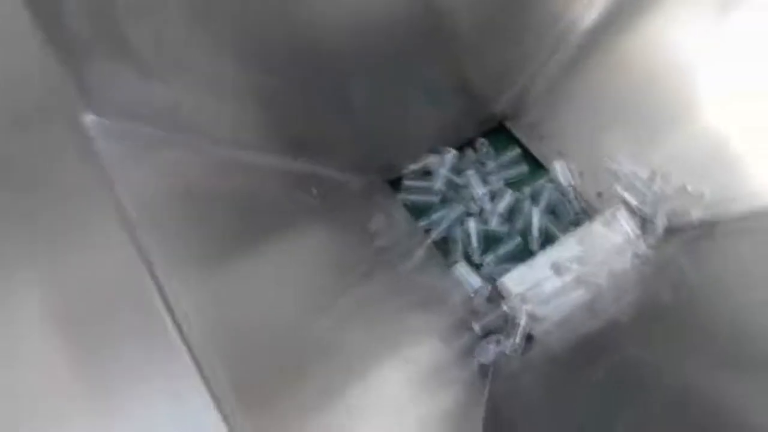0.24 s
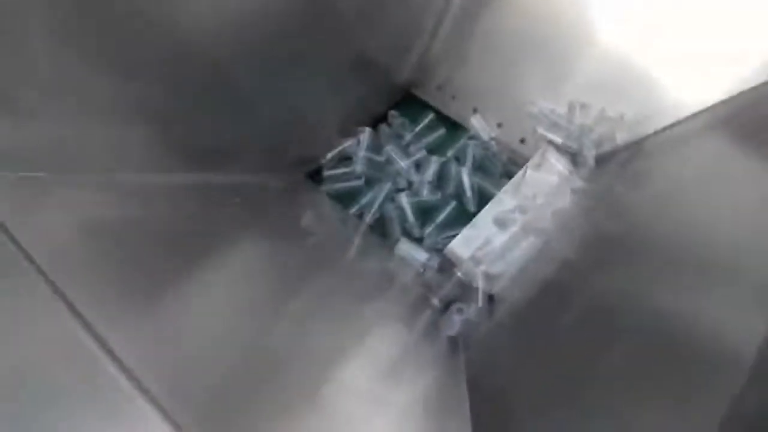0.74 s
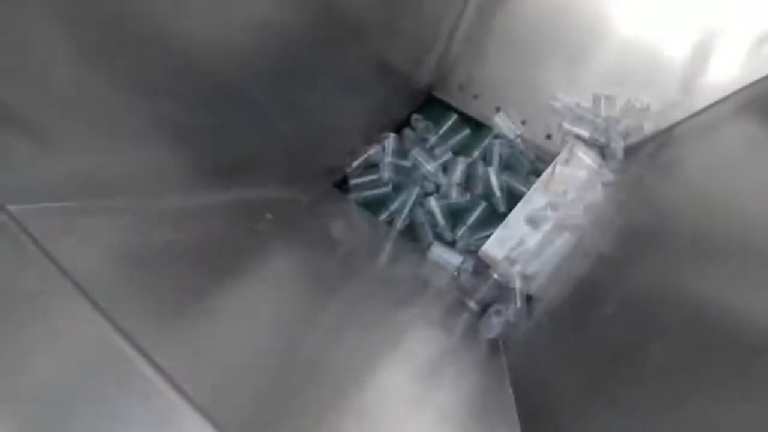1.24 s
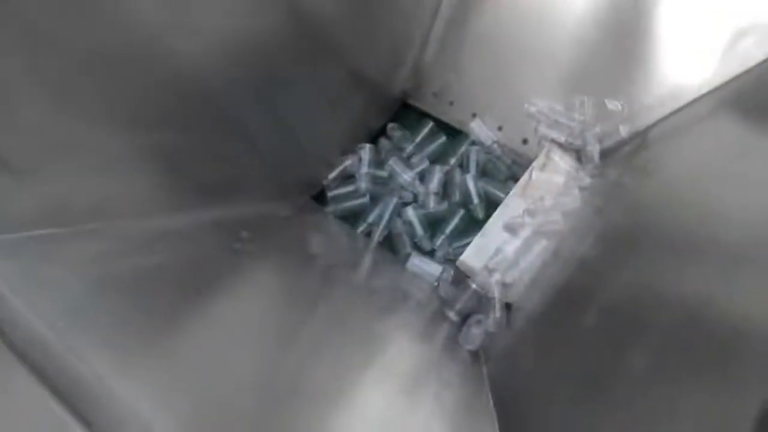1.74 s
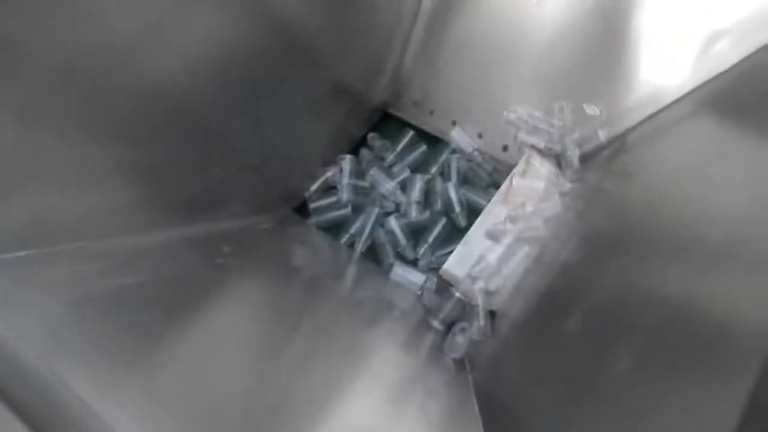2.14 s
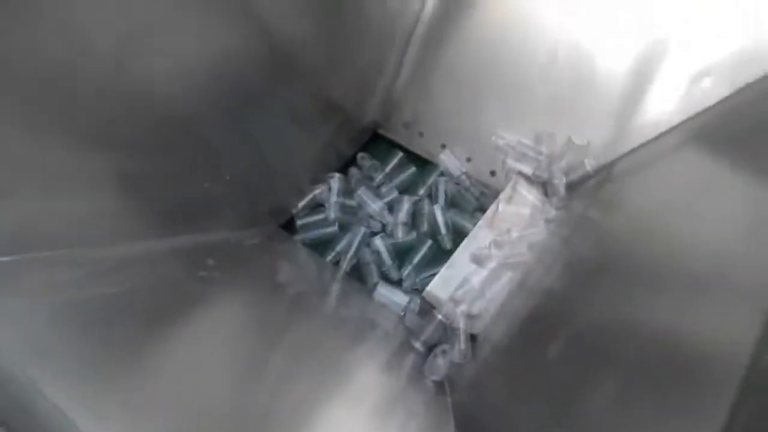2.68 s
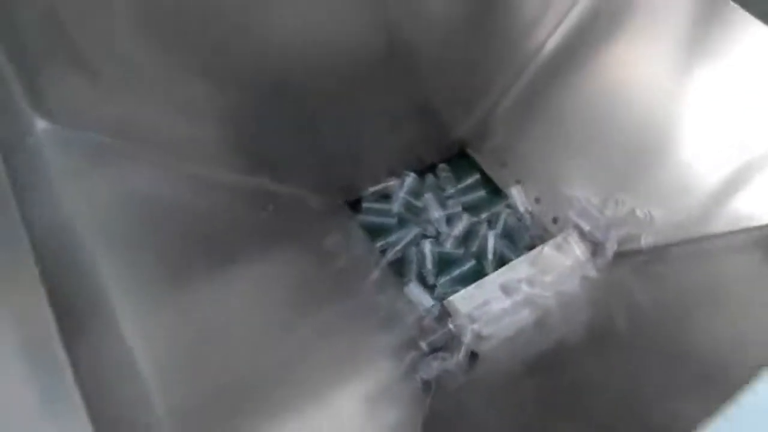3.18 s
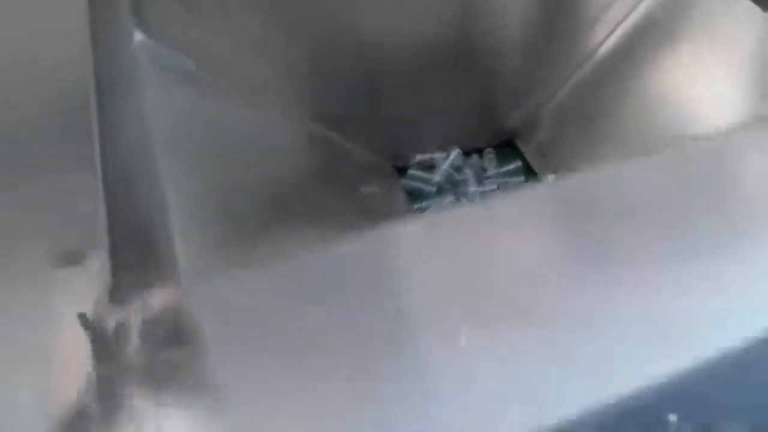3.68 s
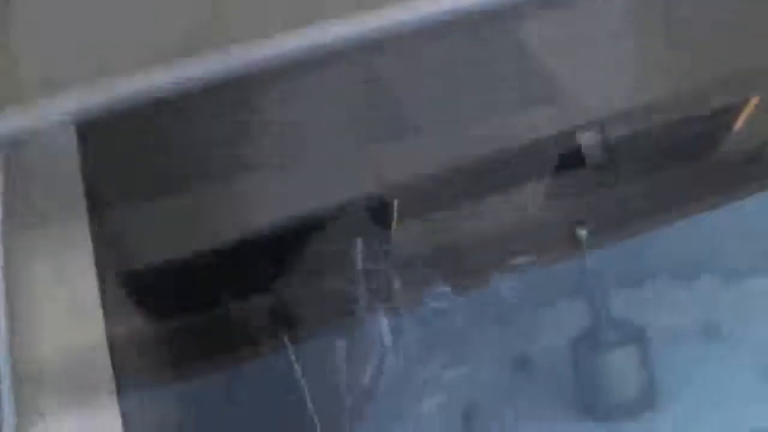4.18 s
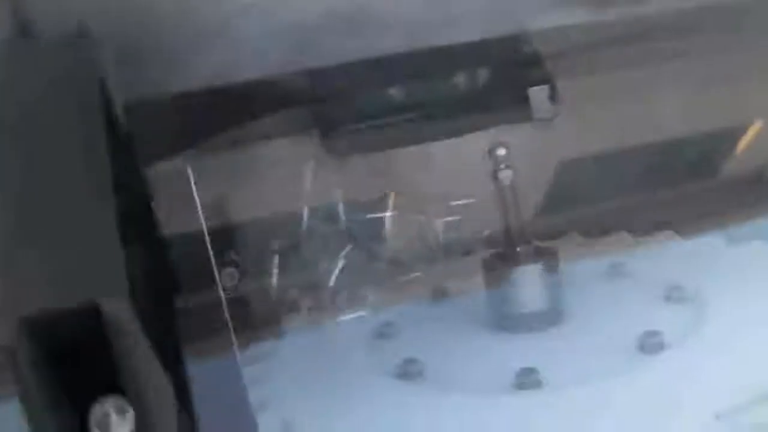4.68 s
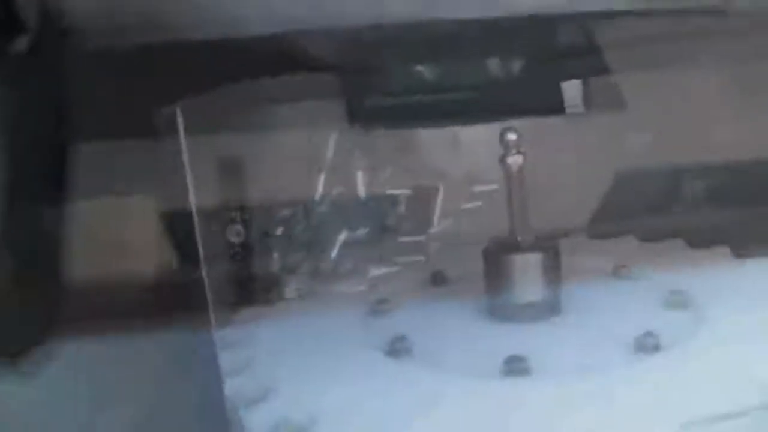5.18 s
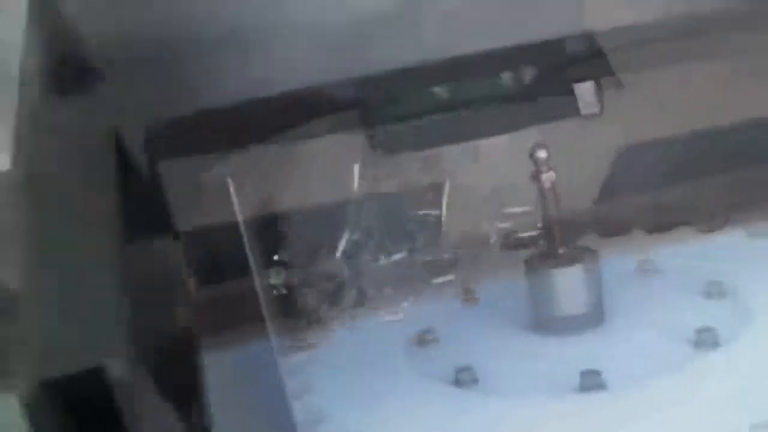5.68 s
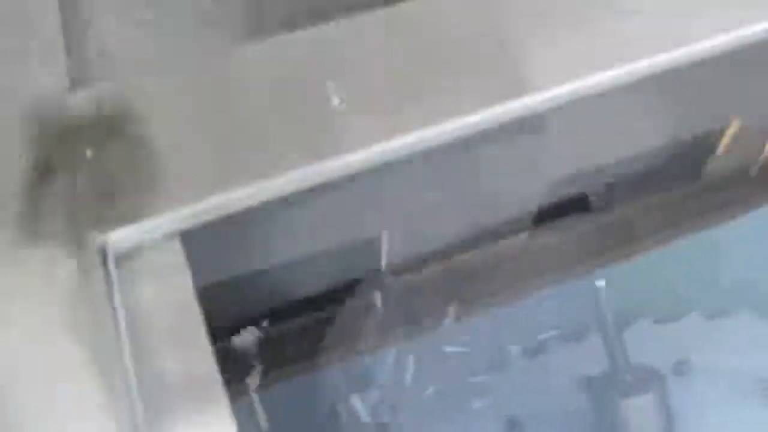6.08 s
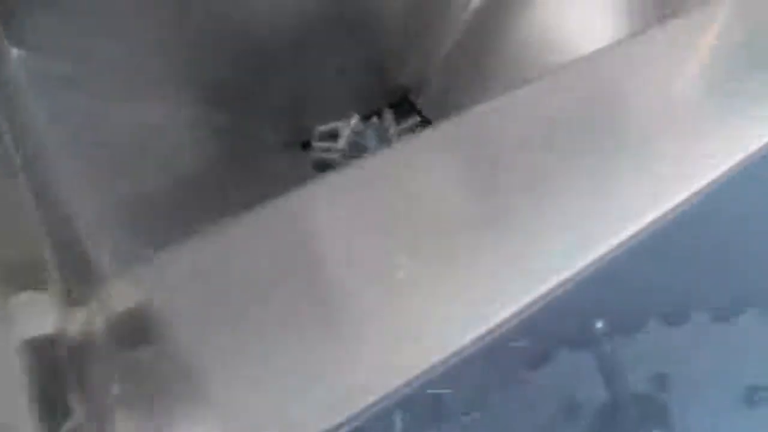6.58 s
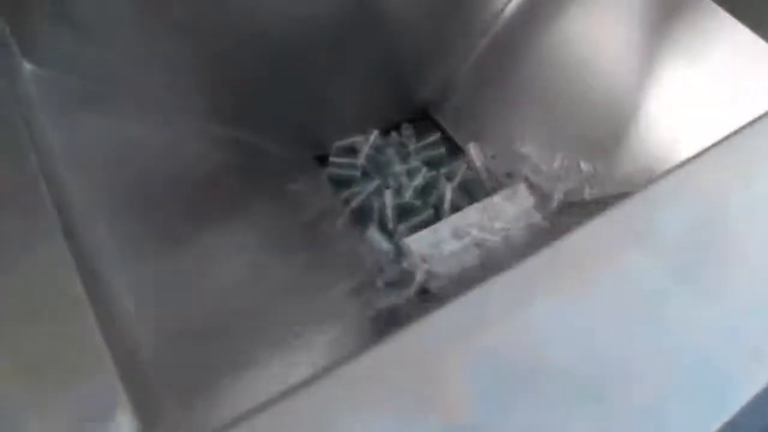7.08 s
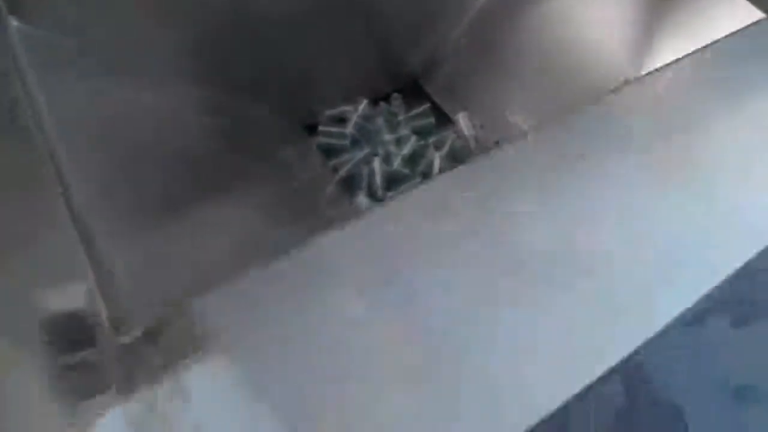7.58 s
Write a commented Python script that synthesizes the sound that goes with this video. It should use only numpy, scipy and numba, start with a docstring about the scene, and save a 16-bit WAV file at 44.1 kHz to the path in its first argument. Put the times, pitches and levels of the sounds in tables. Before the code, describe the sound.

Air jets rush continuously, bright and breathy over an open steel hopper, duller as the phone moves over the sorting disc. Plastic bottles tumble in short rattling bursts with hard clicks and a few soft hollow pops. Regular hollow steel thumps come early, strong ones follow around the middle, then only faint knocks near the end above a low wavering motor hum. The mono phone sound is compressed and slightly clipped.

```python
"""Bottles tumbling in a steel hopper

Small plastic bottles rattle as many short ringing collisions, with louder clacks and hollow pops.
A lifting step knocks the steel walls with a thump and a boom, and a steel bar rings once.
Air jets hiss as filtered noise; a motor hums as wavering tones, strongest in the later part.
A hand-held mono phone hears it all; its gain control ducks the hiss after loud knocks."""
import sys
import numpy as np
from scipy import signal
from scipy.fft import rfft, irfft
from scipy.io import wavfile
from scipy.ndimage import uniform_filter1d
from numba import njit

SR = 44100
rng = np.random.default_rng(int(sys.argv[2]) if len(sys.argv) > 2 else 0)


def materialize(psi):
    """Save the field psi as 16-bit PCM at rate SR to the path in sys.argv[1].

    A 1-D psi becomes a single channel; in a 2-D psi each row is a channel.
    """
    bounded = np.clip(np.atleast_2d(psi).T, -1, 1)
    quanta = np.round(bounded * 32767).astype(np.int16)
    wavfile.write(sys.argv[1], SR, quanta)


N = 345303  # length in samples

# In every table, t60 is the time a ringing tone takes to fall by 60 dB.
# Tones of the bottle bodies. Each row: pitch in Hz, relative level in dB, t60 in seconds.
BODY_TONES = [(1400, -6, .05), (1750, -1, .03), (1950, -1, .03), (2150, -1, .03), (2320, -1, .05),
              (2650, -3, .03)]
# Tones of the bottle necks. Each row: pitch in Hz, relative level in dB, t60 in seconds.
NECK_TONES = [(3190, -2.5, 0.0079), (3580, 3, 0.0063), (4074, 1.5, 0.01), (4470, 1.5, 0.0085),
              (4700, -13, 0.012)]
# Slides of the bottle heap. Each row: start in seconds, length in seconds,
# level of the bodies in dB, level of the necks in dB.
SLIDES = [(0.022, 0.11, -25, -13.5), (0.254, 0.026, -26, -26), (0.373, 0.04, -27, -20),
          (0.485, 0.014, -30, -24), (0.609, 0.069, -29, -22), (0.702, 0.033, -27, -15),
          (0.756, 0.13, -33, -27), (1.173, 0.016, -26.5, -22), (1.22, .1, -24, -25.5),
          (1.363, .04, -23.5, -27), (1.52, 0.033, -25, -32), (1.6, .05, -23, -29),
          (1.717, 0.42, -30.5, -35), (2.28, 0.15, -29, -32), (3.102, 0.078, -31, -33),
          (3.503, 0.042, -28, -26), (3.98, 0.054, -44, -28), (4.135, 0.081, -30, -42),
          (4.616, 0.11, -23, -26), (4.903, 0.035, -24, -23), (5.066, 0.023, -35, -24),
          (5.147, 0.099, -32, -31), (6.838, 0.038, -26.5, -25.5), (7.005, 0.045, -21, -30),
          (7.22, .1, -35, -31)]
# Single bottle clacks. Each row: start in seconds, level in dB, middle pitch in Hz, t60 in seconds.
CLACKS = [(0.0094, -5, 4170, 0.044), (0.3785, -10, 2380, 0.21), (0.379, -11, 3600, 0.04),
          (0.494, -18, 4060, 0.047), (0.621, -20, 4420, 0.054), (0.7063, -19, 4300, 0.06),
          (1.1722, -7.5, 4800, 0.054), (1.216, -14, 2850, 0.11), (1.5994, -25, 2020, 0.055),
          (4.02, -13, 5460, 0.06), (4.8968, -7, 4800, 0.043), (5.1394, -12, 3010, 0.083),
          (6.353, -16, 5540, 0.06), (6.8317, -12, 4400, 0.06), (7.0085, -29, 2440, 0.06),
          (7.4476, -12, 5420, 0.072)]
# Hollow pops of a bottle mouth. Each row: start in seconds, level in dB, middle pitch in Hz, t60 in seconds.
POPS = [(1.292, -28, 880, .2), (3.159, -24, 845, .2), (3.99, -21, 850, .25), (6.255, -25, 865, .22),
        (7.254, -27, 845, .15)]
# Knocks on the hopper. Each row: start in seconds, blow in dB, rim rattle against the boom in dB,
# scrape just before in dB.
KNOCKS = [(0.365, -16.5, -1, -31), (0.881, -5, 3, -29), (1.405, -6, 3, -22), (1.937, -11.5, 5, -26),
          (2.469, -6.5, 5, -35), (2.485, -16, 3, -18), (2.989, -5.5, 5, -28), (3.557, -1.5, 5, -19),
          (4.553, 0, 2, -17), (5.808, -7, 1.5, -28), (6.829, -38, 4, -28), (7.258, -30, 2, -24)]
# Tones of the hopper wall. Each row: pitch in Hz, relative level in dB, t60 in seconds.
WALL_TONES = [(204, -4, 0.53), (235, 2.5, 0.32), (261.5, 3.5, 0.27), (301, -2, 0.46), (336, -6, 0.16),
              (411.6, -1.5, 0.19), (530, -8, 0.2), (750, 6, 0.092), (793, 0, 0.18), (919, 16, 0.1)]
# Tones of a steel bar struck once. Each row: pitch in Hz, level in dB, t60 in seconds.
BAR_TONES = [(899, -22, 2.5), (1077, -25, 2.), (1340, -22, 1.5), (1567, -21, 1.), (2051, -18, 1.2),
             (2336, -25, 2.)]
# Air jets as the phone moves. Each row: time in seconds, level in dB, treble gain in dB, rumble gain in dB.
AIR_LEVELS = [(0.0, -14, -5, 5.5), (0.75, -16.5, -4.5, 6.5), (1.3, -15.5, -2, 4.5), (2.0, -17, -2.5, 6.5),
              (2.7, -17, -2, 3), (3.4, -15, -5.5, 3), (3.75, -11.5, -9, 1), (4.3, -14, -9, 2),
              (5.0, -13, -7.5, 3), (5.85, -13, -10, 4), (6.25, -13, -8.5, -2.5), (6.9, -14.5, -6.5, 3.5),
              (7.83, -13, -8.5, 1)]
# Basic colour of the hiss. Each row: frequency in Hz, relative level in dB per Hz.
AIR_COLOUR = [(20, -33), (100, -28.5), (165, -31.5), (300, -20.5), (500, -18), (800, -13.5), (1300, -10),
              (2000, -6.5), (3500, -5.5), (6000, -3.5), (9500, -3), (13000, -4), (15700, -4)]
# Resonances of the hiss over the open hopper. Each row: centre in Hz, width in Hz, boost in dB.
OVER_HOPPER = [(2240, 140, -2), (4250, 330, 1), (5420, 300, 3), (6690, 560, 3), (7360, 1050, 4),
               (8420, 690, 4), (9230, 530, 3.5), (11900, 600, 1.5), (13800, 1100, 6.5), (15200, 600, 5)]
# Resonances of the hiss over the sorting disc. Each row: centre in Hz, width in Hz, boost in dB.
OVER_DISC = [(4140, 930, 0.5), (5540, 210, 4), (6580, 440, 3.7), (8220, 400, 2.9), (8950, 700, 0.99),
             (10500, 380, 1.9), (11600, 650, 1.3), (14000, 920, 1)]
# Where the phone is. Each row: time in seconds, share of the hopper from 0 to 1 (the rest is the disc).
PLACE = [(0, 0.84), (3.4, 0.76), (3.8, 0.17), (6.3, 0), (6.8, .5), (7.5, 0.5), (7.83, .2)]
# Tones of the motor. Each row: frequency in Hz, rms level in dB before waver and swell.
HUM_TONES = [(100, -63), (200, -61), (300, -54), (400, -69), (500, -45.5), (630, -58)]
# Swell of the motor hum. Each row: time in seconds, gain in dB.
HUM_SWELL = [(0, -7), (4.9, -22), (5.4, 3), (6., 1), (7.83, 0)]

# Pairs are for bodies, then necks. Random wander and stutter are given before smoothing.
SHUFFLE_DB, SHUFFLE_WANDER_DB = (-38.5, -34), 3
SLIDE_RISE_S, SLIDE_FALL_S, SLIDE_STUTTER_DB = .025, .025, 2.5
JOLT_DB, JOLT_FALL_S = (-13.5, -25), 0.038  # bottles shaken by a knock, level against its blow
PUSH_MS = 0.71  # time scale of the thump
BOOM_DB, WALL_DB = -10.5, -30.5  # boom against the blow; wall tones against the boom
BAR_S, BAR_DAMPED_S = 4.54, 4.89
NOTCH_HZ, NOTCH_WIDTH_HZ, TOP_HZ = 7880, 200, 15750


def undb(db):
    """Turn decibels into a plain factor."""
    return 10 ** (np.asarray(db) / 20)


def unit(x):
    """Scale a sound to an rms level of 1."""
    return x / np.sqrt(np.mean(x ** 2))


def curves(table):
    """Join the rows of a table with straight lines over time, one curve per column after the first."""
    s, *columns = np.transpose(table)
    return [np.interp(np.arange(N) / SR, s, c) for c in columns]


def band(x, lo_hz, hi_hz):
    """Keep only the frequencies between two limits."""
    return signal.sosfilt(signal.butter(2, [lo_hz, hi_hz], "band", fs=SR, output="sos"), x)


def ring(x, hz, t60):
    """Ring one fading tone; a single blow of size 1 rings with height 1."""
    pole = np.exp((2j * np.pi * hz - np.log(1000) / t60) / SR)
    return signal.lfilter([1], [1, -pole], x).imag


def blows(times, sizes):
    """Make silence with one-sample blows at the given times in seconds."""
    x = np.zeros(N)
    x[(np.asarray(times) * SR).astype(int)] = sizes
    return x


def walk(rate):
    """Draw about `rate` random levels per second and smooth the steps between them twice."""
    hold = int(SR / rate)
    steps = np.repeat(rng.standard_normal(N // hold + 1), hold)
    return uniform_filter1d(uniform_filter1d(steps, hold), hold)[:N]


def tumble(rate=300, scatter_db=2.2, spread=.025, count=3):
    """Dense small collisions: each tone has detuned copies, each hit at its own random times."""
    out = 0
    for part, tones in enumerate((BODY_TONES, NECK_TONES)):
        swarm = 0
        for hz, db, t60 in tones:
            for detune in np.linspace(-spread, spread, count):
                at = rng.integers(0, N, int(rate * N / SR))  # rate is in hits per second
                sizes = undb(scatter_db * rng.exponential(size=len(at)))
                signs = rng.choice([-1, 1], len(at))
                hits = blows(at / SR, sizes * signs)
                swarm = swarm + undb(db) * ring(hits, hz * (1 + detune), t60)
        out = out + bustle(part) * unit(swarm)
    return out


def bustle(part):
    """How hard bodies (0) or necks (1) collide: a wandering shuffle, slides, a jolt at each knock."""
    t = np.arange(N) / SR
    out = undb(SHUFFLE_DB[part] + SHUFFLE_WANDER_DB * walk(5))
    stutter = undb(SLIDE_STUTTER_DB * walk(40))
    for s, length, *db in SLIDES:
        # the rise leads up to the start, the fall follows the end
        rise = np.clip(1 + (t - s) / SLIDE_RISE_S, 0, 1) ** 2
        fall = np.exp(-np.maximum(t - s - length, 0) / SLIDE_FALL_S)
        out = out + undb(db[part]) * stutter * rise * fall
    for s, db, *_ in KNOCKS:
        fall = (t > s) * np.exp(-np.maximum(t - s, 0) / JOLT_FALL_S)
        out = out + undb(db + JOLT_DB[part]) * fall
    return out


def taps(table, spread, count):
    """Clacks or pops: each rings a cluster of close tones, struck within a few milliseconds."""
    out = np.zeros(N + SR)
    blow = np.arange(SR // 2) == 0
    for s, db, hz, t60 in table:
        for pitch_draw, delay_draw in rng.random((count, 2)):
            i = int((s + 0.0092 * delay_draw) * SR)
            tone = ring(blow, hz * (1 + spread * (2 * pitch_draw - 1)), t60)
            out[i:i + SR // 2] += undb(db) / np.sqrt(count) * tone
    return out[:N]


def knocks():
    """A short push thumps and rings the wall; noise adds a boom, a rim rattle and a scrape ahead."""
    out, t = np.zeros(N + 2 * SR), np.arange(SR) / SR
    for s, db, rim_db, scrape_db in KNOCKS:
        lag = (t - .005) * 1000 / PUSH_MS  # the push peaks after 5 ms
        thump = (1 - 2 * lag ** 2) * np.exp(-lag ** 2)
        # each knock strikes the wall anew: levels and pitches vary
        draws = [4, .03] * rng.standard_normal((len(WALL_TONES), 2))
        wall = sum(undb(level + extra_db) * ring(thump, hz * (1 + detune), t60)
                   for (hz, level, t60), (extra_db, detune) in zip(WALL_TONES, draws))
        # the boom dies away fast at first, then slowly
        fade = (t > .004) * (np.exp(-t / 0.036) + 0.42 * np.exp(-t / 0.21))
        boom = fade * unit(band(rng.standard_normal(SR), 124, 680))
        rim_fade = (t > .004) * np.exp(-t / 0.046)
        rim = rim_fade * unit(band(rng.standard_normal(SR), 550, 1100))
        body = boom + undb(rim_db) * rim + undb(WALL_DB) * wall
        i = int(s * SR)
        out[i:i + SR] += undb(db) * (thump + undb(BOOM_DB) * body)
        length = SR // 40
        scrape = np.hanning(length) * unit(band(rng.standard_normal(length), 1200, 3200))
        first = i - length * 3 // 4
        out[first:][:length] += undb(scrape_db) * scrape
    return out[:N]


def bar():
    """Long steel tones from one blow, which something touches and stills."""
    t = np.arange(N) / SR
    still = np.exp(-np.maximum(t - BAR_DAMPED_S, 0) / 0.017)
    blow = blows([BAR_S], 1)
    return still * sum(undb(db) * ring(blow, hz, t60) for hz, db, t60 in BAR_TONES)


def resonate(spectrum, hz, place):
    """Boost the hiss around the resonances of one place."""
    boost_db = sum(db * np.exp(-(2 * (hz - centre) / width) ** 2) for centre, width, db in place)
    return irfft(spectrum * undb(boost_db), N)


def air():
    """Turbulent hiss in three ranges that flutter together and a little alone, coloured by the place."""
    db, top_db, low_db = curves(AIR_LEVELS)
    hopper = np.clip(curves(PLACE)[0], 0, 1)
    hz = np.arange(N // 2 + 1) * SR / N + 1  # the extra 1 Hz keeps zero out of the logarithm
    colour_hz, colour_db = np.transpose(AIR_COLOUR)
    colour = undb(np.interp(np.log(hz), np.log(colour_hz), colour_db))
    noise = rfft(rng.standard_normal(N)) * colour
    noise = noise / np.std(irfft(noise, N))
    # soft splits near 1500 Hz and 10500 Hz
    low = 1 / (1 + (hz / 1500) ** 4)
    top = 1 / (1 + (10500 / hz) ** 8)
    parts = [(low, low_db + 2.5 * walk(9)),
             (1 - low - top, 2.0 * walk(12)),
             (top, top_db + 0.47 * walk(8.2))]
    mix = sum(undb(gain_db) * irfft(noise * share, N) for share, gain_db in parts)
    hiss = rfft(undb(db + 1.0 * walk(6.9)) * mix)
    over_hopper = resonate(hiss, hz, OVER_HOPPER)
    over_disc = resonate(hiss, hz, OVER_DISC)
    return hopper * over_hopper + (1 - hopper) * over_disc


def motor():
    """Steady motor tones that waver a little in level and phase."""
    t = np.arange(N) / SR
    tones = 0
    for hz, db in HUM_TONES:
        height = np.sqrt(2) * undb(db + 2.2 * walk(8.2))  # root 2 turns rms into peak
        tones = tones + height * np.sin(2 * np.pi * hz * t + 1.5 * walk(4))
    return undb(curves(HUM_SWELL)[0]) * tones


def scene():
    """Add up all sources, the same in both channels."""
    hits = tumble() + knocks() + taps(CLACKS, 0.131, count=12) + taps(POPS, 0.0042, count=1) + bar()
    # the hits keep no deep bass below about 170 Hz
    hits = signal.sosfilt(signal.butter(4, 170, "high", fs=SR, output="sos"), hits)
    mono = air() + hits + motor()
    return np.array([mono, mono])


@njit
def follow(x, attack, release, start):
    """Track the loudness: rise fast and fall slowly."""
    y, e = np.empty(len(x)), start
    for i in range(len(x)):
        e += (abs(x[i]) - e) * (attack if abs(x[i]) > e else release)
        y[i] = e
    return y


def record(dry):
    """The phone: a narrow dip of the microphone port, gain control, clipping, top cut."""
    x = signal.lfilter(*signal.iirnotch(NOTCH_HZ, NOTCH_HZ / NOTCH_WIDTH_HZ, SR), dry[0])
    # the gain control reacts more to bass than to hiss
    bass = signal.sosfilt(signal.butter(2, 900, fs=SR, output="sos"), x)
    attack_s, release_s = 0.0017, .06
    loudness = follow(x + 0.57 * bass, 1 / (attack_s * SR), 1 / (release_s * SR), 0.49)
    # above a loudness of 0.3 the gain drops almost as fast as the loudness grows
    gain = np.minimum(1, (0.3 / loudness) ** .9)
    x = np.clip(x * gain, -1, 1)
    x = signal.sosfilt(signal.ellip(12, .2, 70, TOP_HZ, fs=SR, output="sos"), x)
    return np.array([x, x])


dry = scene()
out = record(dry)
materialize(out)
```